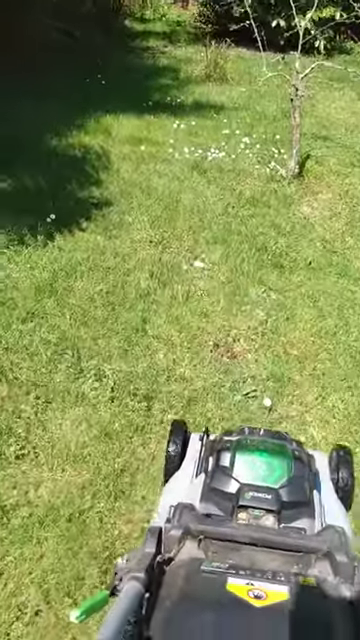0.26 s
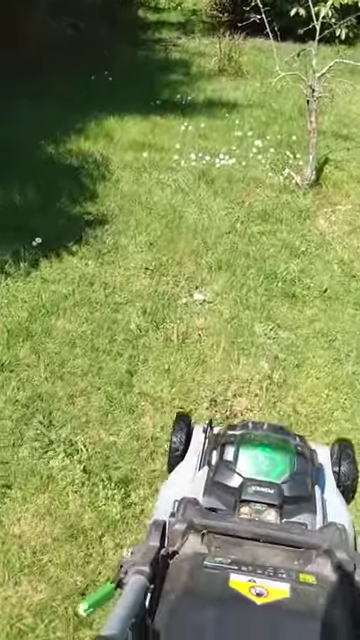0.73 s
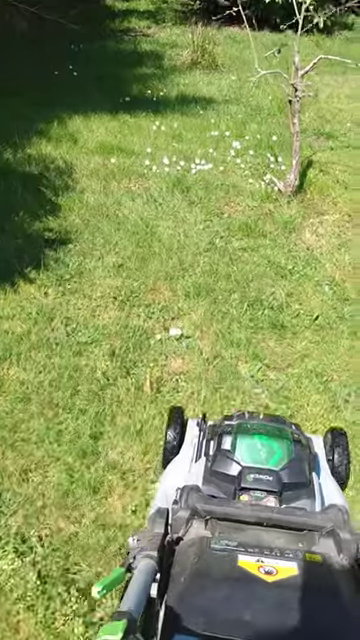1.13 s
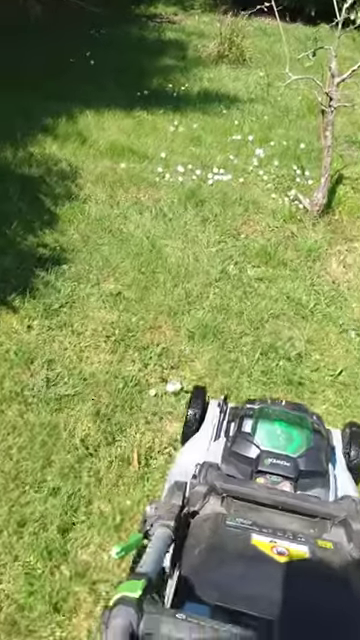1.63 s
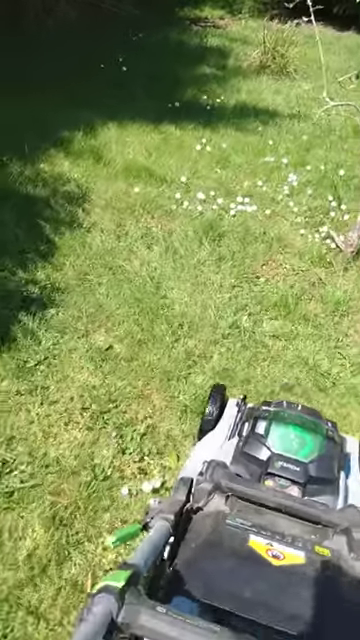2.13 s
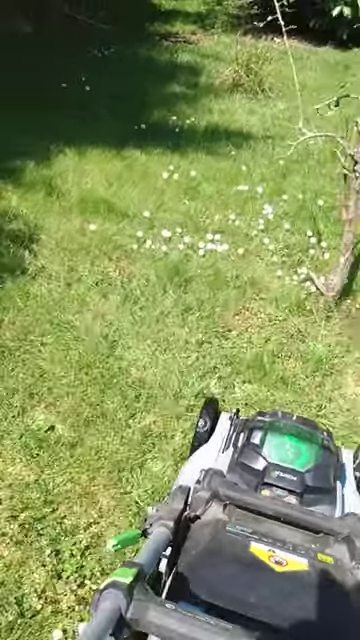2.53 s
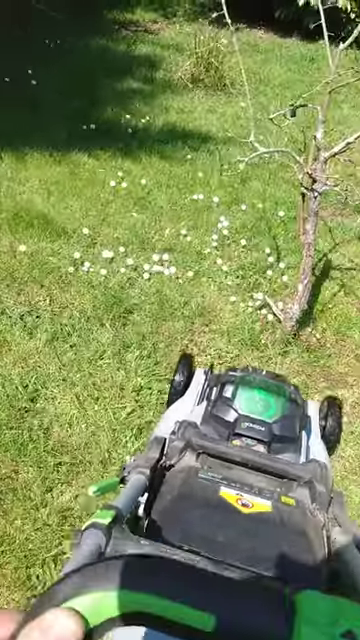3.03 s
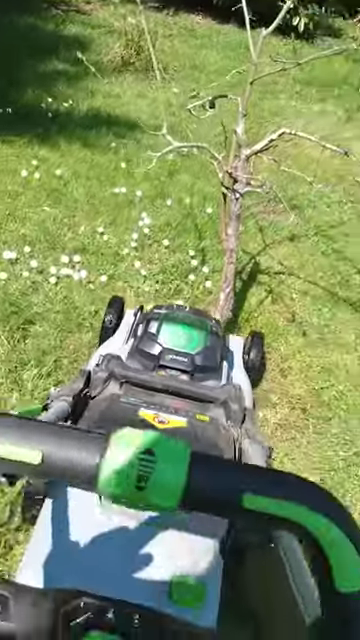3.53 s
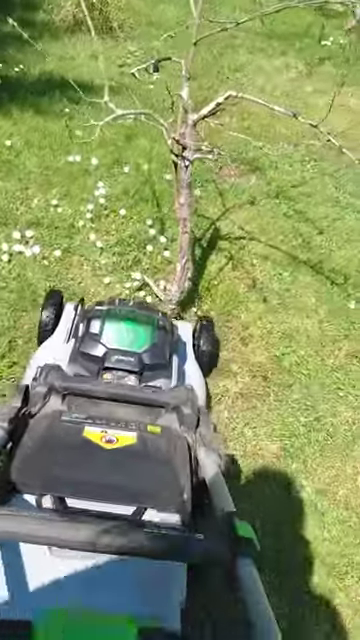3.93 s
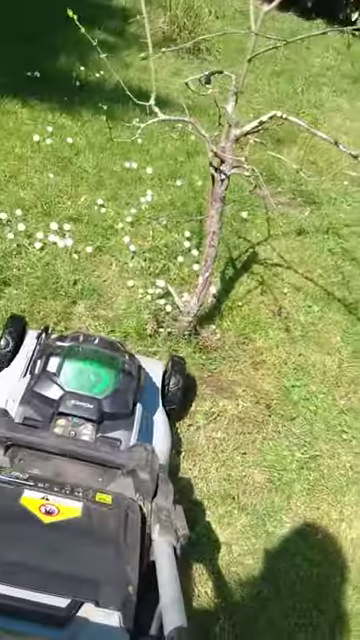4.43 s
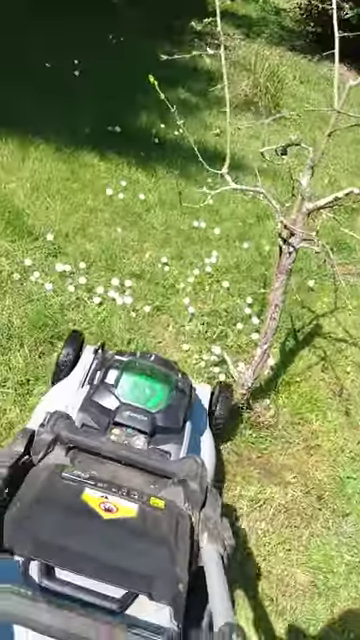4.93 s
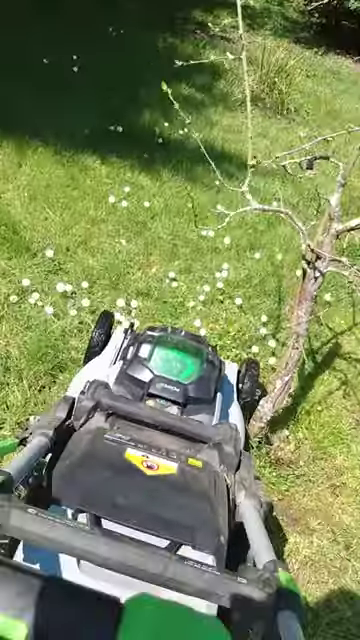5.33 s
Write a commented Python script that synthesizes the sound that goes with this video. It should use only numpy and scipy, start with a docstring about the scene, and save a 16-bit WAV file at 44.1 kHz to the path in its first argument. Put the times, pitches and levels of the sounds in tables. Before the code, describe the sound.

A battery lawn mower hums low and wavering through grass, with rushing air, crackling stalks and small ticks on its plastic housing.

```python
"""On a lawn, a battery mower is pushed along, heard from behind its handle.
The spinning blade makes a wavering hum, from sine waves, and churns the air in the deck, from shaped noise.
Stalks crackle and hiss tuft by tuft; the motor whines thinly, a breeze rumbles and debris ticks on the housing.
The blade slows a little in thick grass. Beside a small tree it runs freely and the rear of the deck is
heard more directly; near the end a wheel brushes past the foot of the tree."""
import sys
import numpy as np
from scipy import signal
from scipy.fft import rfft, irfft, next_fast_len
from scipy.io import wavfile
from scipy.ndimage import uniform_filter1d, map_coordinates

SR = 44100
rng = np.random.default_rng(int(sys.argv[2]) if len(sys.argv) > 2 else 0)


def transcribe(u):
    """Save the signal u as a 16-bit wav file named by the first command-line argument.

    u: samples, shape (n,) or (channels, n), limited to [-1, 1]; the rate is SR.
    q: integer samples, one column per channel.
    """
    v = np.clip(np.atleast_2d(u).T, -1, 1)
    q = np.round(v * 32767).astype(np.int16)
    wavfile.write(sys.argv[1], SR, q)


N = 245620

# Table levels are starting points: the functions may scale them or make them waver.
# speed of the blade: [t/s, blade passes per second f/Hz]
BLADE_SPEED = [(0, 94.4), (.29, 96), (.58, 95), (.68, 94.6), (.85, 95.9), (1.05, 94.5), (1.22, 93.7),
               (1.55, 96.6), (2.05, 96.2), (2.52, 96.8), (2.9, 95), (3.25, 98), (3.47, 96.3), (4.12, 98.9),
               (4.55, 98.3), (5.2, 96.8), (5.44, 95.6), (5.57, 95)]
# view into the rear of the deck: [t/s, share 0-1, frequency scale of its resonances (a ratio)]
REAR_VIEW = [(0, 0.02, 1.5), (2.9, 0.05, 1.26), (3.38, 0.2, 1.08), (3.62, 0.88, 1.144), (4.05, 0.99, 1.077),
             (4.35, 0.91, 1.04), (4.95, 0.92, 1), (5.57, 0.83, 1.02)]
# harmonics of the blade: [multiple of the blade rate, level/dB, gain near the rear/dB, flutter/dB]
BLADE_HARMONICS = [(1, -23, -0.1, .5), (2, -21.5, 0, 1), (3, -30.5, 1.5, 2.5), (4, -32.5, 3, 2.5),
                   (5, -41.5, 3, 3), (6, -48.5, 2.5, 1.5), (7, -59.5, -2, -2), (8, -52, 2, 2.5),
                   (10, -56.5, 3, 2)]
# slow changes of the second harmonic: [t/s, level/dB]
SECOND_HARMONIC_SWELL = [(0, 0), (.42, -4.5), (.57, 1), (.72, -3), (1.18, 2.5), (1.62, -3), (1.92, 0),
                         (2.3, 0), (2.55, 2.5), (2.68, -1), (3.1, 0), (3.28, -4), (3.7, 2), (4.24, -0.5),
                         (4.46, 2.5), (4.92, 2), (5.17, -2.5), (5.57, -5.5)]
# slow changes of the third harmonic: [t/s, level/dB]
THIRD_HARMONIC_SWELL = [(.1, -8), (.27, 4), (.52, -14), (.8, 4.5), (.95, -3), (1.25, 5.5), (1.9, -9),
                        (2.16, 6), (2.34, -7), (2.5, 1.5), (2.64, -1), (2.97, 4.5), (3.13, -5.5),
                        (3.36, 4.5), (3.65, -6), (4.98, -11), (5.17, 6), (5.45, -1.5)]
# slow changes of the fourth harmonic: [t/s, level/dB]
FOURTH_HARMONIC_SWELL = [(0, -9), (.14, 5), (.5, -7.5), (.63, 6.5), (.9, -7.5), (1.18, 3.5), (1.4, -2.5),
                         (1.5, 3), (1.62, -1.5), (2.4, -1.5), (2.9, 2), (3.6, -4), (3.85, -1), (4.35, 1.5),
                         (4.93, 1.5), (5.19, -10), (5.32, 5), (5.57, -6)]
# spectrum of the air heard through the deck's shell: [f/Hz, relative level/dB]
SHELL_SPECTRUM = [(40, -49), (110, -14.5), (165, -6), (230, -1), (330, -3), (440, -5), (540, -11.5),
                  (760, -12), (1150, -16.5), (1450, -15.5), (1780, -24), (2220, -19), (2700, -27),
                  (4200, -33.5), (8000, -43)]
# spectrum of the air heard at the rear of the deck: [f/Hz, relative level/dB]
REAR_SPECTRUM = [(40, -36), (130, -8), (230, 0.5), (430, -2.5), (540, -7), (670, -16), (800, -12),
                 (1080, -9.5), (1400, -14.5), (1700, -19.5), (2000, -17.5), (2380, -17.5), (2680, -26),
                 (3150, -29), (3800, -32), (6000, -44.5), (9000, -51.5)]
# strength of the turbulence in the deck: [t/s, level/dB]
TURBULENCE = [(0, -0.5), (.4, 0), (.8, -.7), (1.25, -0.5), (1.62, 0.5), (2.1, 0), (2.48, -1), (3.0, -0.5),
              (3.4, 1), (3.9, -0.6), (4.33, 1.05), (4.78, -1.2), (5.1, 0.1), (5.57, -0.5)]
# spectrum of the cut grass: [f/Hz, relative level/dB]
GRASS_SPECTRUM = [(1500, -29), (3000, 4), (4300, -1.5), (5700, 4), (7000, -1.5), (8700, -2), (10300, 1),
                  (13000, 1.5), (16000, -2)]
# tufts of thicker grass meeting the blade: [peak t/s, length/s, level/dB]
GRASS_TUFTS = [(.61, 0.081, -39.5), (.75, .09, -42.5), (1.0, 0.082, -44), (1.1, 0.21, -43.5),
               (1.46, .07, -51), (1.6, 0.13, -44), (1.89, .09, -43), (2.37, .08, -46), (2.52, 0.091, -42),
               (2.76, 0.21, -43.5), (2.91, .1, -41), (3.05, 0.074, -46), (3.18, 0.076, -44),
               (3.27, 0.098, -43), (3.39, 0.092, -40.5), (3.72, 0.067, -54), (3.93, .08, -53),
               (4.36, .2, -48.5), (5.29, 0.29, -42.5), (5.56, 0.098, -40)]
# motor tones that follow the speed: [multiple of the blade rate, level/dB]
MOTOR_TONES = [(30, -63), (33, -73), (41.7, -64)]
# spectrum of wind on the microphones: [f/Hz, relative level/dB]
WIND_SPECTRUM = [(15, -24), (35, -8), (55, 1), (80, 0), (140, -9), (300, -47)]
# breaths of wind on the microphones: [peak t/s, length/s, level/dB]
WIND_GUSTS = [(.35, .25, -39), (.6, 0.29, -34), (3.27, 0.23, -32)]
# bits of debris hitting the housing: [t/s, level/dB, ring f/Hz]
DEBRIS_TICKS = [(.6085, -30, 3700), (.7442, -32, 5500), (2.5167, -33, 5030), (2.892, -37, 5959),
                (3.1717, -28, 11900), (3.273, -27.5, 12500), (3.3861, -30, 5100), (3.481, -21, 3193),
                (4.0422, -33, 4000), (4.3817, -23, 10970), (4.4081, -34, 10400), (5.1552, -31, 5960),
                (5.294, -29.5, 4330)]
# spectrum of a wheel on bark and dry stalks: [f/Hz, relative level/dB]
BARK_SPECTRUM = [(1200, -27), (2500, 2), (3300, -5), (4150, -1), (5200, -20), (8000, -13), (15000, -22)]
# a wheel brushing past the foot of the tree: [peak t/s, length/s, level/dB]
WHEEL_SCRAPES = [(5.29, 0.15, -39.5), (5.56, .08, -49)]
# how alike left and right are in noise: [f/Hz, likeness 0-1]
LEFT_RIGHT_LIKENESS = [(60, 0.94), (290, 0.89), (640, 0.45), (1400, 0.75), (3000, 0.62), (6000, 0),
                       (15000, 0.015)]
# difference in colour between the microphones: [f/Hz, left minus right level/dB]
MICROPHONE_BALANCE = [(100, 1.3), (300, 1.2), (690, -0.6), (1200, 4.5), (2300, -0.5), (4500, 2),
                      (9000, -1.9), (15000, -0.9)]

WORKING_HZ = 97.36  # blade rate in ordinary grass; any faster and it runs almost free
RISE_SHARE = 0.44  # part of a swell's length spent rising
TOP_HZ = 15900  # upper limit of the microphones


def amp(db):
    """Turn decibels into gain."""
    return 10 ** (np.asarray(db) / 20)


def unit(x):
    """Scale a signal to rms 1."""
    return x / np.sqrt(np.mean(x ** 2) + 1e-20)


def along(points, hz):
    """Read a table of frequency and value on a log frequency axis."""
    f, v = np.transpose(points)
    return np.interp(np.log(hz + 1), np.log(f + 1), v)


def curves(rows):
    """Give one value per sample for each column after the time."""
    s, *columns = np.transpose(rows)
    return [np.interp(np.arange(N) / SR, s, column) for column in columns]


def wobble(rate):
    """Make a smooth random curve through `rate` random points a second."""
    points = rng.standard_normal(int(N * rate / SR) + 4)
    return map_coordinates(points, [np.arange(N) * rate / SR])


def filtered(x, response):
    """Multiply the spectrum of x by a response that depends on frequency."""
    m = next_fast_len(N + SR // 4)  # spare room for the filter's tail
    spectrum = rfft(x, m) * response(np.fft.rfftfreq(m, 1 / SR))
    return irfft(spectrum, m)[..., :N]


def rush(spectrum, patchy_db=0., scale=0.99):
    """Stereo noise of rms 1, alike in the bass; higher up, resonances shift by scale and come in patches."""
    hz, t, noise = signal.stft(rng.standard_normal((2, N)), SR, nperseg=2048)
    hz = hz[:, None]
    upper = np.clip(hz / 1000 - .5, 0, 1)  # 0 below 500 Hz, 1 above 1500 Hz
    shift = np.interp(t * SR, np.arange(N), scale * np.ones(N)) ** upper
    patches = rng.standard_normal(noise.shape[1:])
    for _ in range(2):
        patches = uniform_filter1d(patches, size=6, axis=0)  # across frequency
        patches = uniform_filter1d(patches, size=9, axis=1)  # across time
    colour = amp(along(spectrum, hz / shift) + patchy_db * upper * unit(patches))
    # the mix of shared and opposite noise sets how alike the two sides are
    turn = np.arccos(along(LEFT_RIGHT_LIKENESS, hz)) / 2
    mixed = noise * colour * [np.cos(turn), np.sin(turn)]
    mid, side = signal.istft(mixed, nperseg=2048)[1][:, :N]
    return unit(np.array([mid + side, mid - side]))


def from_right(x, lag_ms):
    """Sound from the right reaches the left microphone later, by lag_ms."""
    lag_s = np.array([[.5], [-.5]]) * lag_ms / 1000
    return filtered(x, lambda hz: np.exp(-2j * np.pi * hz * lag_s))


def swells(rows, bed_db):
    """Gain of a bed plus events that peak at their time; length is between the points 10 dB below the peak."""
    t, power = np.arange(N) / SR, amp(bed_db) ** 2
    for s, length, db in rows:
        away = np.maximum((s - t) / RISE_SHARE, (t - s) / (1 - RISE_SHARE)) / length
        power = power + amp(db - 10 * away) ** 2
    return np.sqrt(power)


def blade_hum(phase, speed, near, bog_hz=95.6, bog_db_per_hz=2.2, drift=0.16):
    """Each blade pass is a pressure pulse; harmonics waver, and the fundamental weakens as the blade bogs down."""
    bog_db = -bog_db_per_hz * np.maximum(bog_hz - speed, 0) * (1 - near)
    slow_db = {1: bog_db,
               2: curves(SECOND_HARMONIC_SWELL)[0],
               3: curves(THIRD_HARMONIC_SWELL)[0],
               4: curves(FOURTH_HARMONIC_SWELL)[0]}
    # the deck's cavity turns the harmonics against the fundamental, most of all at the rear
    turn = (1 + 1.5 * near) / 2  # radians
    hum = np.zeros(N)
    for multiple, db, near_db, flutter_db in BLADE_HARMONICS:
        k = round(multiple)
        level_db = db + slow_db.get(k, 0) + near_db * near + flutter_db * wobble(11)
        offset = turn * ((k > 1) + (k > 4))  # turned once above the first harmonic, twice above the fourth
        offset = offset + drift * min(k - 1, 4) * wobble(5)
        hum += amp(level_db) * np.cos(k * phase + offset)
    through_shell = from_right((1 - near) * hum, lag_ms=0.16)
    from_rear = from_right(near * hum, lag_ms=0.08)
    return np.sqrt(2) * (through_shell + from_rear)


def deck_air(phase, near, shell_db=-26, rear_db=-26, waver_db=0.73,
             throb=0.13, rear_throb=.24, uneven=0.072):
    """Turbulence in the deck; above the bass it comes in puffs, one for each blade pass."""
    shell_noise = rush(SHELL_SPECTRUM, patchy_db=2.0)
    shell = from_right(shell_noise, lag_ms=0.2) * amp(shell_db)
    rear_noise = rush(REAR_SPECTRUM, patchy_db=1.67, scale=curves(REAR_VIEW)[1])
    rear = from_right(rear_noise, lag_ms=0.097) * amp(rear_db)
    strength = amp(curves(TURBULENCE)[0] + waver_db * wobble(8))
    air = (np.sqrt(1 - near) * shell + np.sqrt(near) * rear) * strength
    bass = filtered(air, lambda hz: 1 / (1 + (hz / 850) ** 8))
    depth = throb + (rear_throb - throb) * near
    puffs = 1 - depth * np.cos(phase) + uneven * wobble(70)
    return bass + (air - bass) * unit(puffs)


def cutting(phase, speed, lawn_db=-53, free_db=6, patchy_db=1.5, snaps_per_s=1200,
            spread_db=3.5, snap_db=-2.5, hiss_db=-2.5):
    """Stalks snap at the blade tips and clippings hiss along the chute: most in tufts, least when running free."""
    chance = snaps_per_s / SR * (1 - .4 * np.cos(phase))  # snaps bunch with the blade passes
    sizes = amp(spread_db * np.minimum(rng.exponential(size=N), 2))
    sizes = sizes * np.clip(rng.standard_normal((2, N)), -2, 2)  # differs left and right
    clicks = (rng.random(N) < chance) * sizes
    snaps = filtered(clicks, lambda hz: amp(along(GRASS_SPECTRUM, hz)))
    running_free = np.clip(speed - WORKING_HZ, 0, 1)
    bed_db = lawn_db - free_db * running_free + patchy_db * wobble(15)
    level = swells(GRASS_TUFTS, bed_db) * amp(wobble(90))
    hiss = rush(GRASS_SPECTRUM, patchy_db=4.0)
    return level * (amp(snap_db) * unit(snaps) + amp(hiss_db) * hiss)


def motor_whine(phase, drive_hz=7007, drive_db=-71):
    """Thin motor tones follow the blade's rotation, while the drive whistles at a nearly steady pitch."""
    t, sides = np.arange(N) / SR, []
    for _ in range(2):  # the wavering differs left and right
        motor = np.zeros(N)
        for k, db in MOTOR_TONES:
            motor += amp(db + 2.2 * wobble(2.939)) * np.sin(k * phase + wobble(10))
        drive = amp(drive_db) * np.sin(2 * np.pi * drive_hz * t + wobble(16))
        sides.append(motor + drive)
    return np.array(sides)


def breeze(calm_db=-47):
    """Moving air rumbles softly, differently on each microphone."""
    rumble = np.array([rush(WIND_SPECTRUM)[0], rush(WIND_SPECTRUM)[1]])
    return swells(WIND_GUSTS, calm_db) * amp(wobble(12)) * rumble


def debris(t60_s=0.013, attack_s=0.00054, ring_width=0.22, crack_db=-10, ping_db=-7):
    """Hard bits flung against the plastic give short, damped ticks: a band of crackle round one ringing mode."""
    out, t = np.zeros((2, N + SR)), np.arange(2048) / SR
    hz = np.fft.rfftfreq(len(t), 1 / SR)
    envelope = amp(-60 * t / t60_s) * (1 - np.exp(-t / attack_s))
    for s, db, ring_hz in DEBRIS_TICKS:
        ring_band = 1 / np.hypot(1, (hz / ring_hz - 1) / ring_width) ** 2
        colour = ring_band + amp(crack_db) * (hz > 1800)
        burst = unit(irfft(rfft(rng.standard_normal((2, len(t)))) * colour))
        ping = amp(ping_db) * np.sin(2 * np.pi * ring_hz * t)
        start = round(s * SR)
        out[:, start:start + len(t)] += amp(db - 0.5) * (burst + ping) * envelope
    return out[:, :N]


def scrape(ring_hz=4120, ring_db=-13):
    """The wheel rubs unevenly over bark and dry stalks, and the housing rings faintly."""
    t = np.arange(N) / SR
    ring = amp(ring_db) * np.sin(2 * np.pi * ring_hz * t + 2 * wobble(90))
    rubbing = rush(BARK_SPECTRUM, patchy_db=2)
    level = swells(WHEEL_SCRAPES, -np.inf) * amp(2 * wobble(140))  # no bed between the scrapes
    return level * (rubbing + ring)


def scene():
    """The blade's rotation drives hum, air, cutting and motor tones together; the other sounds are added."""
    speed, near = curves(BLADE_SPEED)[0], curves(REAR_VIEW)[0]
    phase = 2 * np.pi * np.cumsum(speed) / SR  # one turn of phase per blade pass
    mower = blade_hum(phase, speed, near) + deck_air(phase, near)
    mower = mower + cutting(phase, speed) + motor_whine(phase)
    return mower + breeze() + debris() + scrape()


def record(dry):
    """The two microphones differ a little in colour and share a band limit."""
    half = np.array([[.5], [-.5]])  # half the difference on each side
    return filtered(dry, lambda hz: amp(half * along(MICROPHONE_BALANCE, hz)) * (hz < TOP_HZ))


dry = scene()
out = record(dry)
transcribe(out)
```